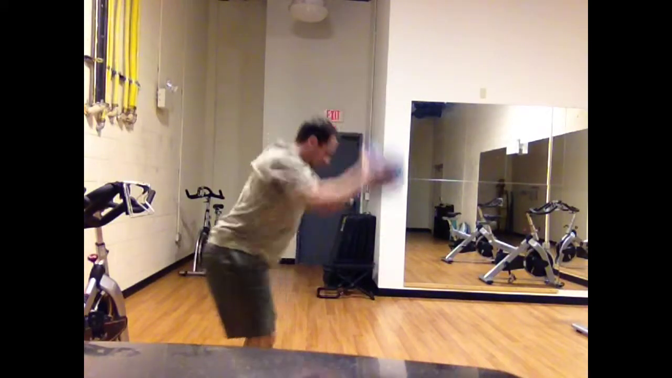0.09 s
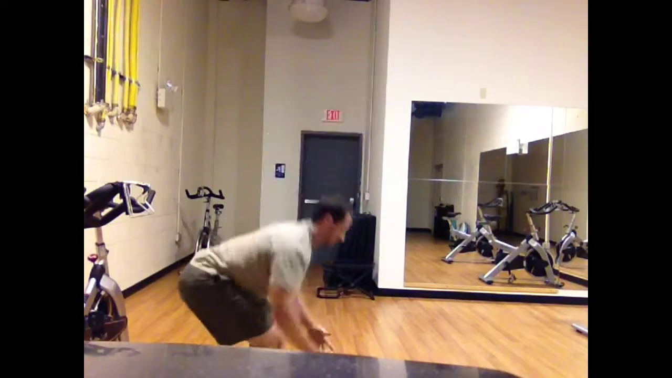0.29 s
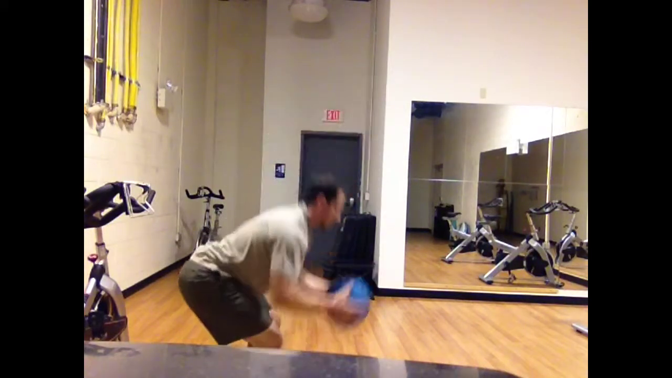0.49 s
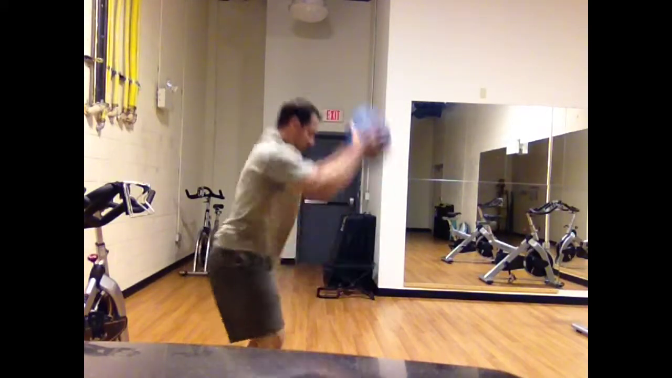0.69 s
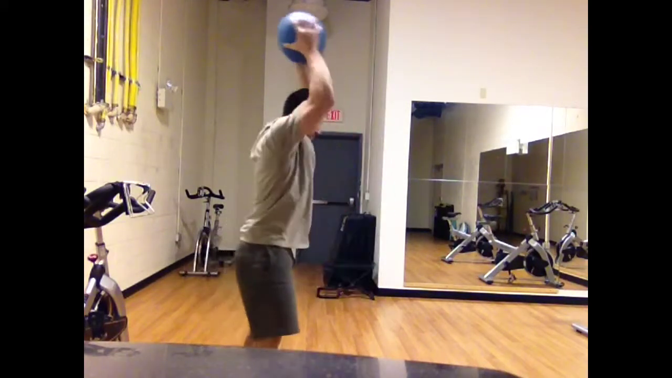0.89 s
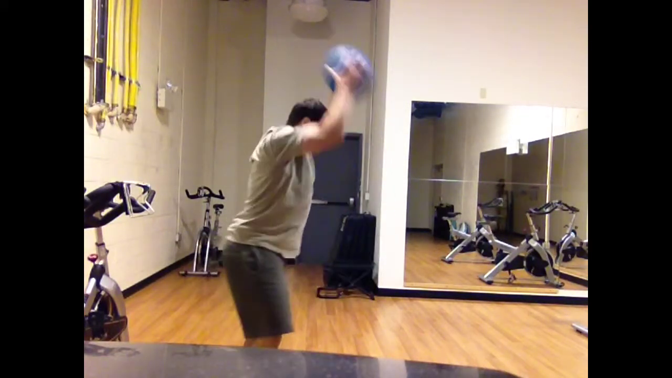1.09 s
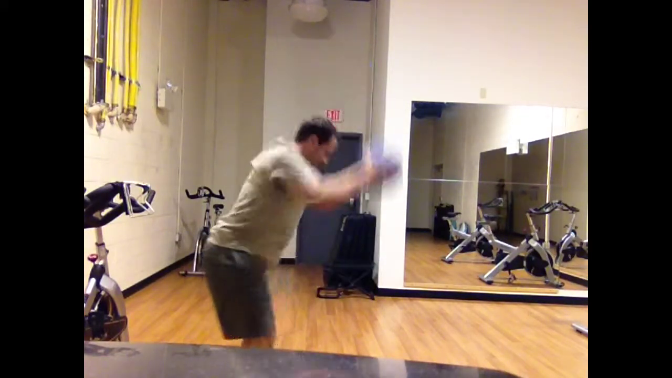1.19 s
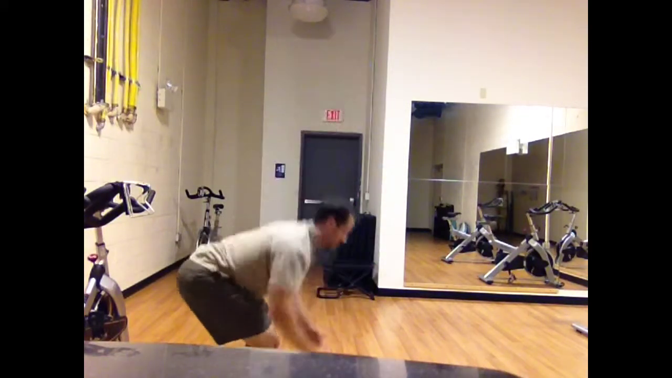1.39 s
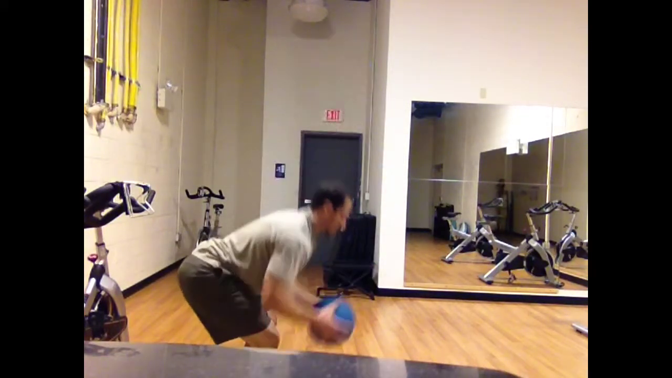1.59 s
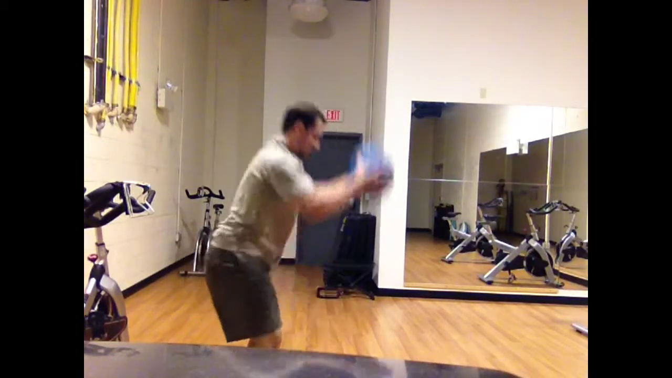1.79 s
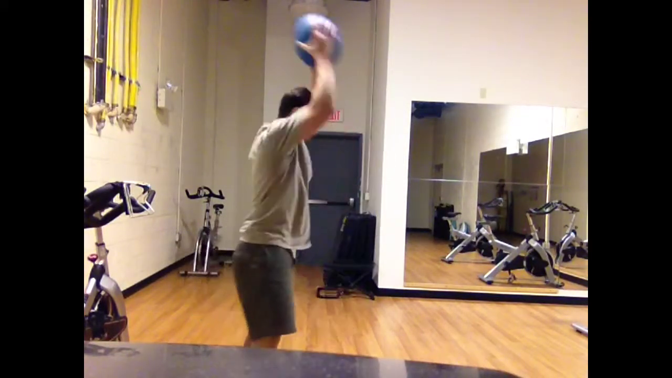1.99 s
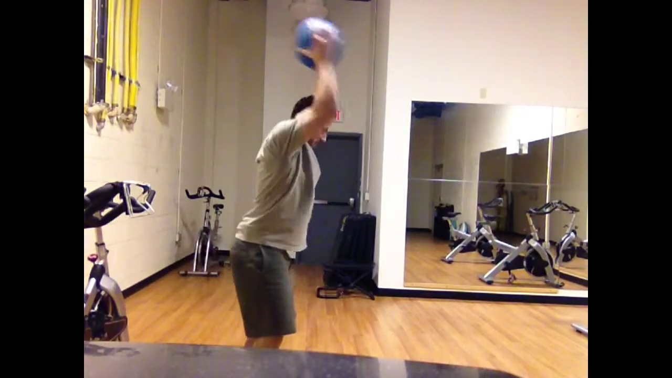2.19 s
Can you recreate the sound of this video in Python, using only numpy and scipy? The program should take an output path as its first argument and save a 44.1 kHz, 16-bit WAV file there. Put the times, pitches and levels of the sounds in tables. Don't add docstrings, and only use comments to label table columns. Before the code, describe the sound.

A heavy rubber ball slams onto a wooden gym floor, close to one microphone. An earlier slam's echo is fading at the start. At 0.24 s comes a sharp, cracking smack with a short thud and low board boom, then quick reflections and a long hall ring. A slightly softer, duller slam follows at 1.36 s. Faint cloth swishes precede both; ventilation hums and lamps whine very quietly.

```python
import sys
import numpy as np
from scipy import signal
from scipy.fft import rfft, irfft
from scipy.io import wavfile
from scipy.ndimage import uniform_filter1d

SR = 44100
rng = np.random.default_rng(int(sys.argv[2]) if len(sys.argv) > 2 else 0)


def boost_factor(decibels):
    exponent = np.asarray(decibels, float) / 20
    return 10 ** exponent


def materialize(psi):
    bounded = np.clip(np.atleast_2d(psi).T, -1, 1)
    quanta = np.round(bounded * 32767).astype(np.int16)
    wavfile.write(sys.argv[1], SR, quanta)


N = 97020
LEAD = SR
WHIP_S, THUD_HZ = .0014, 1500


def read(points, hz):
    f, value = np.transpose(points)
    return np.interp(np.log(hz + 1), np.log(f + 1), value)


def evened(x):
    return x / np.sqrt(np.mean(x ** 2) + 1e-20)


def add(mix, s, sound):
    part = mix[LEAD + round(s * SR):][:len(sound)]
    part += sound[:len(part)]


def shaped(x, gain):
    return irfft(rfft(x) * gain(np.fft.rfftfreq(len(x), 1 / SR)), len(x))


def taps():
    out = np.zeros((SR // 4, 10))
    places = rng.integers(0, 10, len(out))
    out[np.arange(len(out)), places] = np.tanh(rng.standard_normal(len(out)))
    return evened(out.ravel())


def hall(low, high, bright_db):
    # frequency in Hz, density in dB per Hz.
    hall_colour = [(40, -32), (110, -16.5), (340, -15), (800, -1.5), (1650, -4), (2050, -8.5), (5300, -7.5),
                   (5900, -12), (11000, -23.5), (15500, -29)]
    # centre in Hz, width in Hz, lift in dB.
    bumps = [(1180, 330, 1), (4450, 520, 2)]
    # frequency in Hz, 60 dB decay in s.
    ring_times = [(60, 1.87), (250, 1.13), (500, 1.586), (1200, 2.192), (2500, 1.62), (5200, 0.81),
                  (9000, 0.56), (15000, 0.34)]
    ring_db, build_from_db, build_s = -13.5, -8.5, .031
    frame = 512

    def share(hz):
        return 1 / (1 + (hz / 2500) ** 4)

    def colour(hz):
        bump_db = sum(db * np.exp(-((hz - f) / w) ** 2) for f, w, db in bumps)
        treble_db = bright_db * np.tanh((hz / 6000) ** 4)
        return boost_factor(read(hall_colour, hz) + treble_db + bump_db)

    x = shaped(low, lambda hz: colour(hz) * np.sqrt(share(hz)))
    x = x + shaped(high, lambda hz: colour(hz) * np.sqrt(1 - share(hz)))
    hz, t, z = signal.stft(evened(x), SR, nperseg=frame)
    decay = boost_factor(-60 * t / read(ring_times, hz)[:, None])
    x = signal.istft(z * decay, SR, nperseg=frame)[1]
    t = np.arange(len(x)) / SR
    build = boost_factor(ring_db + build_from_db * np.exp(-(t / build_s) ** 4))
    return x * build * np.minimum(t / 0.00067, 1)


def air():
    # frequency in Hz, density in dB per Hz.
    air_colour = [(40, -29), (70, -16.5), (130, 2), (220, 5.5), (350, -3.5), (2000, -13), (6000, -28),
                  (9500, -35), (10500, -48), (15000, -37)]
    # frequency in Hz, rms level in dB.
    lamp_tones = [(5642, -86), (5760, -91), (6121, -85), (6842, -88.5), (8882, -94.5), (9480, -96)]
    t = np.arange(N) / SR
    whine = sum(boost_factor(db) * np.sqrt(2) * np.sin(2 * np.pi * hz * t) for hz, db in lamp_tones)
    rumble = shaped(rng.standard_normal(N), lambda hz: boost_factor(read(air_colour, hz)))
    return whine + boost_factor(-56.5) * evened(rumble)


def shirt():
    # peak in seconds, level in dB.
    swishes = [
        (.195, -67.5),
        (1.3, -68),
    ]
    rise_s, bright_hz = .065, 4470
    t = np.arange(N) / SR
    rub = evened(shaped(rng.standard_normal(N), lambda hz: hz ** 2 / (hz ** 2 + bright_hz ** 2)))
    return rub * sum(boost_factor(db) * np.exp(-((t - s) / rise_s) ** 2) for s, db in swishes)


def whip(start_hz):
    end_hz, peak_db, grow_db, hiss_db = 3900, -1, 15, -17
    u = np.arange(0, 1.12, 1 / (WHIP_S * SR))
    turns = np.cumsum(start_hz * (end_hz / start_hz) ** u ** 1.2) / SR
    tone = -np.cos(2 * np.pi * (turns - np.interp(1, u, turns)))
    tone = tone + boost_factor(hiss_db) * rng.standard_normal(len(u))
    swell = boost_factor(peak_db + grow_db * (np.minimum(u, 1) - 1.5))
    fade = np.clip(np.minimum((1.12 - u) / 0.062, u / 0.2), 0, 1)
    return swell * tone * fade


def thud():
    shell_db, shell_t60 = -7, .0045
    board_hz, board_db, board_t60 = 121.3, -41.5, 1.07
    t = np.arange(SR // 2) / SR
    shell = -boost_factor(shell_db - 60 * t / shell_t60) * np.sin(2 * np.pi * THUD_HZ * t)
    board = boost_factor(board_db - 60 * t / board_t60) * np.sin(2 * np.pi * board_hz * t)
    return shell, board


def slams():
    # contact in seconds, strength in dB, whip start in Hz, brightness above 6 kHz in dB.
    slam_rows = [
        (-.87, 0, 10000, 0),
        (.2431, 0, 10500, 1),
        (1.35695, -.7, 8500, -1),
    ]
    # delay in s, whip level in dB, thud level in dB.
    echoes = [(0, 0, 0), (.0027, -4, -3), (.0044, -9, -8), (.0065, -14, -1), (.0093, -14, -5),
              (.0166, 0, 0), (.0232, -11, 2), (.0268, -5, -6), (.0284, -1, 2), (.0378, -8, -2),
              (.0485, -7, -1)]
    out = np.zeros(LEAD + N)
    low = taps()
    shell, board = thud()
    for s, db, hz, bright_db in slam_rows:
        for delay, whip_db, thud_db in echoes:
            add(out, s + delay - WHIP_S, boost_factor(db + whip_db) * whip(hz))
            add(out, s + delay - 1 / (4 * THUD_HZ), boost_factor(db + thud_db) * shell)
        add(out, s, boost_factor(db) * board)
        add(out, s + 0.00028, boost_factor(db) * hall(low, taps(), bright_db))
    return out[LEAD:]


def scene():
    return (slams() + air() + shirt())[None]


def roll_off(x):
    return signal.sosfilt(signal.butter(12, 16340, fs=SR, output="sos"), x)


def record(dry):
    knee_db, squeeze, recover_db_per_s = -26, 0.37, 59
    grip = 600
    top_hz, top_leak_db = 15250, -36
    dry = signal.sosfilt(signal.butter(2, 111, 'high', fs=SR, output='sos'), dry)
    power = abs(uniform_filter1d(dry[0] ** 2, size=grip, origin=grip // 2 - 1))
    power_db = 10 * np.log10(power + 1e-12)
    fall = np.arange(N) * recover_db_per_s / SR
    held_db = np.maximum.accumulate(power_db + fall) - fall
    over_db = np.maximum(held_db - knee_db, 0)
    cut_db = squeeze * uniform_filter1d(over_db, size=grip // 3, origin=grip // 6 - 1)
    held = dry / boost_factor(cut_db)
    held = shaped(held[0], lambda hz: boost_factor(top_leak_db * np.clip((hz - top_hz) / 200, 0, 1)))[None]
    return roll_off(held)


dry = scene()
out = record(dry)
materialize(out)
```